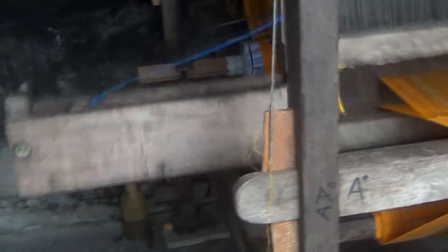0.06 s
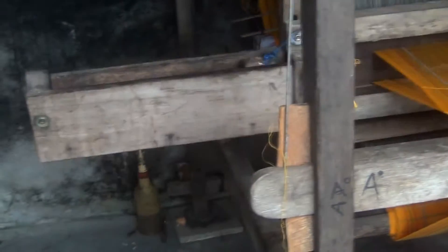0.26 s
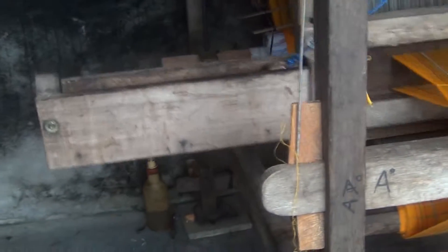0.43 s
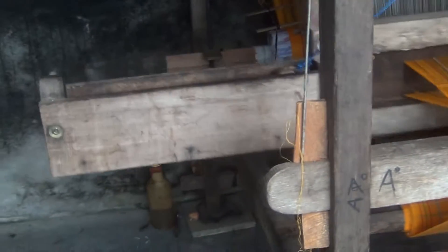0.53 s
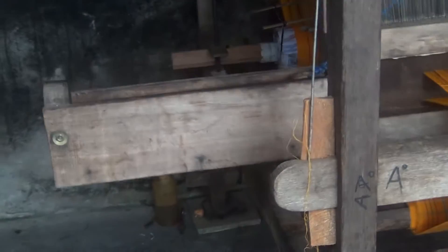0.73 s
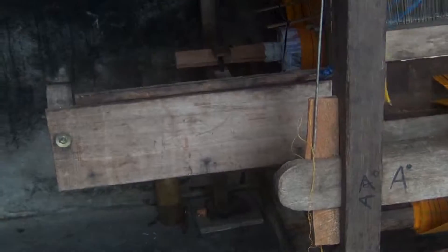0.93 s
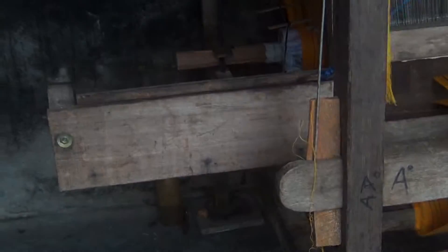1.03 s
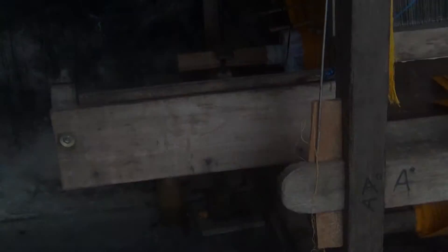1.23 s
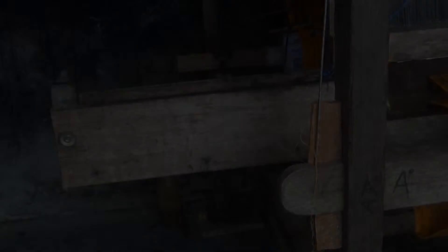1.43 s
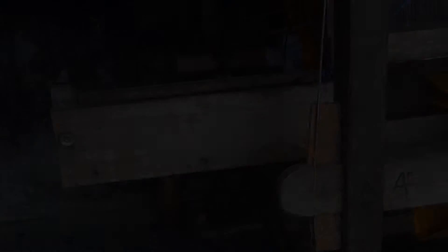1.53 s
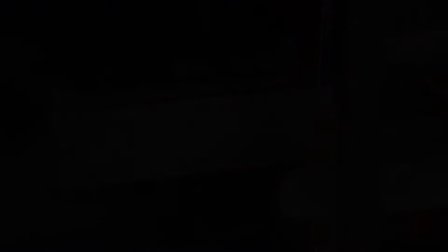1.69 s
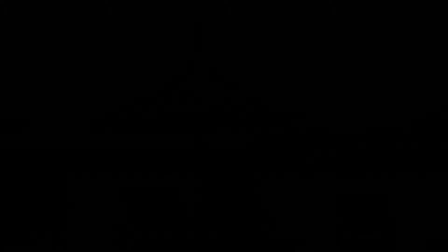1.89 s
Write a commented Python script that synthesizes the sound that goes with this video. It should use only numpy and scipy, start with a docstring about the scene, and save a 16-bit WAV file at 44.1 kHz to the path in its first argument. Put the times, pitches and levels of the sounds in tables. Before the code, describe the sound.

A wooden handloom clacks sharply as its shuttle rattles across and lands with a brief metallic ring. The beater clacks, then soft knocks and a creak follow. Quiet hiss fades away in the small workshop, heard mostly on the right.

```python
"""A small hard-walled workshop, where a wooden handloom weaves one pick over a steady hiss that fades away.
The picker knocks the shuttle across; it rumbles along its race and lands with a ring of metal.
The beater clacks, then the shafts shift with soft knocks, a creak and a rough drone of the frame.
Impacts give a broadband crack and excite damped modes; friction gives noise or sustains the modes.
The cracks reverberate in a diffuse field whose treble decays first."""
import sys
import numpy as np
from scipy import signal
from scipy.fft import rfft, irfft
from scipy.io import wavfile
from scipy.ndimage import uniform_filter1d

SR = 44100
rng = np.random.default_rng(int(sys.argv[2]) if len(sys.argv) > 2 else 0)


def inscribe(sig):
    """Save sig as 16-bit PCM at rate SR to the path in sys.argv[1].

    A 1-D sig is mono; a 2-D sig holds one channel per row.
    Samples are clipped to [-1, 1] before scaling.
    """
    pcm = np.round(np.clip(np.atleast_2d(sig).T, -1, 1) * 32767)
    wavfile.write(sys.argv[1], SR, pcm.astype(np.int16))


N = 85995
LEAD = SR // 10  # samples before t = 0, so that the loom is already sounding
TIME = np.arange(-LEAD, N) / SR


def from_db(db):
    """Amplitude ratio of a level in decibels."""
    return 10 ** (np.asarray(db) / 20)


def at_hz(points, hz):
    """Interpolation of a table on a logarithmic frequency axis."""
    f, value = np.transpose(points)
    return np.interp(np.log(np.maximum(hz, 1)), np.log(f), value)


def panned(db):
    """Interchannel level difference, left minus right, as two gains with a mean of one."""
    gains = from_db(np.array([np.atleast_1d(db), -np.atleast_1d(db)]) / 2)
    return gains / gains.mean(axis=0)


def convolve(x, response):
    """A linear system convolves its input with its impulse response."""
    return signal.fftconvolve(np.atleast_2d(x), np.atleast_2d(response))[:, :len(TIME)]


def impulse(start):
    """An ideal impact: a unit impulse."""
    return 1.0 * (np.arange(len(TIME)) == int(start * SR) + LEAD)


def minimum_phase(spectrum, size=4096):
    """Causal response of unit energy, obtained by folding the cepstrum of a spectrum."""
    magnitude = from_db(at_hz(spectrum, np.fft.rfftfreq(size, 1 / SR)))
    cepstrum = irfft(np.log(magnitude))
    folded = 2 * cepstrum[:size // 2] * (np.arange(size // 2) > 0)
    response = irfft(np.exp(rfft(folded, size)))
    return response / np.linalg.norm(response)


def even_noise(count, size=512):
    """Whitening: noise of unit variance, its energy spread evenly over time and frequency."""
    noise = rng.standard_normal(count)
    for _ in range(2):
        cells = signal.stft(noise, nperseg=size)[2]
        noise = signal.istft(cells / (abs(cells) + 1e-12), nperseg=size)[1][:count]
    return noise / noise.std()


def swell(start, attack, held, t60):
    """Linear rise, then exponential decay from `held` after the start; all times in seconds."""
    age = np.maximum(TIME - start, 0)
    return np.minimum(age / attack, 1) * from_db(-60 * np.maximum(age - held, 0) / t60)


def wavering(hz, width_hz, rough):
    """Random modulation broadens a line: amplitude and phase wander, as a ring's do in a room."""
    pole = np.exp(-2 * np.pi * width_hz / SR)
    slow = signal.lfilter([1], [1, -2 * pole, pole * pole], rng.standard_normal((2, len(TIME))))
    wander = 1 + rough * (slow[0] + 1j * slow[1]) / slow.std()
    wander /= np.sqrt(uniform_filter1d(abs(wander) ** 2, size=SR // 16))  # steady mean power
    return np.real(wander * np.exp(2j * np.pi * (hz * TIME + rng.random())))


# Left-right coherence of the field: f/Hz, coherence/1
COHERENCE = [(30, 0.42), (100, 0.86), (500, 1), (1000, 0.87), (2000, 0.7), (4000, 0.33), (8000, 0.6),
             (14000, 0.08)]
# Balance, left minus right: f/Hz, level/dB
BALANCE = [(30, -3), (70, -7), (150, -4.5), (300, -7.5), (1000, -10.5), (2000, -11.5), (4000, -14.5),
           (6500, 0), (9000, -1), (13000, -13)]
def diffuse(left_noise, right_noise):
    """Stereo spectrum of a diffuse field: partially coherent, and stronger on the right."""
    hz = np.fft.rfftfreq(len(right_noise), 1 / SR)
    coherence = np.clip(at_hz(COHERENCE, hz), 0, .999)
    right = rfft(right_noise)
    left = coherence * right + np.sqrt(1 - coherence ** 2) * rfft(left_noise)
    return hz, np.array([left, right]) * panned(at_hz(BALANCE, hz))


# Reverberation time: f/Hz, T60/s
REVERBERATION = [(100, 0.43), (400, 0.46), (1000, 0.5), (2800, 0.28), (7000, 0.27), (15000, 0.1)]
def room_response(attack, bands=12):
    """Reverberation: dense reflections build up, then decay exponentially in each band."""
    t = np.arange(SR) / SR
    hz, field = diffuse(right_noise=even_noise(SR), left_noise=even_noise(SR))
    centres = np.geomspace(80, 16000, bands)
    tail = 0
    for centre, weights in zip(centres, np.eye(bands)):
        band = irfft(field * at_hz(np.transpose([centres, weights]), hz), SR)
        tail += band * from_db(-60 * t / at_hz(REVERBERATION, centre))
    tail *= 1 - np.exp(-t / attack)
    return tail / np.linalg.norm(tail.mean(axis=0))


def resonances(modes, rough=0.8):
    """Modal superposition: a sum of wavering partials, each panned by its frequency."""
    return sum(from_db(db) * wavering(hz, width, rough) * panned(at_hz(BALANCE, hz))
               for hz, width, db in modes)


# Spectrum of wood striking wood: f/Hz, relative level/dB
WOOD_CRACK = [(40, -20), (100, -22), (200, -7.5), (450, -4.5), (800, -3), (1300, -3), (2000, -2.5),
              (2800, -4), (3800, -8), (6000, -10), (11000, -21), (16000, -42)]
def knocks(blows, modes, crack_db, ring_db, t60, attack):
    """Impact excitation: each blow cracks through the room and adds energy to the part's damped modes."""
    bass_hz, treble_hz = 330, 3450
    cracks, energy = 0, 0
    for start, db, bass_db, treble_db in blows:
        shelves = [(bass_hz / 2, bass_db), (bass_hz * 2, 0),
                   (treble_hz / 2, 0), (treble_hz * 2, treble_db)]
        contact = minimum_phase(shelves)
        contact /= abs(rfft(contact, SR)[1000])  # unit gain at 1 kHz
        cracks += from_db(db) * convolve(convolve(impulse(start), contact), room_response(attack))
        energy += (from_db(db) * swell(start, attack, attack, t60)) ** 2
    ring = np.sqrt(energy) * resonances([(hz, 21, db) for hz, db in modes], rough=0.92)  # width 21 Hz
    return from_db(crack_db) * convolve(cracks, minimum_phase(WOOD_CRACK)) + from_db(ring_db) * ring


# Ambient spectrum: f/Hz, relative level/dB
HISS_SPECTRUM = [(30, -17), (60, -22), (93, -7.5), (250, -8.5), (420, -9.5), (700, -3), (950, -3.5),
                 (1300, 0.5), (1810, -7), (3000, -7), (4500, -11.5), (5200, -9.5), (8000, -10),
                 (11000, -19.5), (16000, -29)]
# Its narrow peaks: f/Hz, half-width/Hz, rise/dB
HISS_RESONANCES = [(760, 25, 5), (895, 18, 6), (1160, 35, 4.5), (2146, 18, 9), (2562, 44, 6.5),
                   (2970, 90, 6), (5320, 60, 7)]
# Its envelope: t/s, level/dB
HISS_ENVELOPE = [(0, -41.5), (0.2, -41), (0.6, -45), (1.15, -48.5), (1.5, -51), (1.75, -54), (1.89, -60.5)]
def background():
    """Ambient noise: a diffuse hiss with Lorentzian peaks, sinking in level."""
    right, left = rng.standard_normal((2, len(TIME)))
    hz, field = diffuse(left, right)
    peaks_db = sum(db / (1 + ((hz - centre) / width) ** 2) for centre, width, db in HISS_RESONANCES)
    hiss = irfft(field * from_db(at_hz(HISS_SPECTRUM, hz) + peaks_db), len(TIME))
    envelope = from_db(np.interp(TIME, *np.transpose(HISS_ENVELOPE)))
    return envelope * hiss / hiss.mean(axis=0).std()


# Shuttle impacts: t/s, level/dB, bass/dB, treble/dB
SHUTTLE_BLOWS = [(-0.03, -18, 11.5, -18), (0.262, -1, 1, -15.5), (0.283, -8, 9, -13),
                 (0.3345, -5.5, -17, 5), (0.357, -11.5, -5.5, -2), (0.415, -24, 6, 13),
                 (0.445, -24, 14.5, -7)]
# Shuttle modes: f/Hz, level/dB
SHUTTLE_PARTIALS = [(680, -3), (772, -1), (845, -3), (969, 0.5), (1381, -3), (1630, -4), (1971, -4),
                    (2065, -6), (2386, -8), (2920, -12), (4010, -13)]
def shuttle():
    """Impacts with a slow build-up merge into a rumble as the shuttle runs, lands and settles."""
    return knocks(SHUTTLE_BLOWS, SHUTTLE_PARTIALS, crack_db=8.5, ring_db=-27.5, t60=0.39, attack=0.0162)


# Low frame modes: t/s, f/Hz, level/dB, rise/s, T60/s
FRAME_MODES = [(-0.01, 89.4, -51.5, 0.017, 2.3), (0.264, 150.4, -29.5, 0.015, 0.22),
               (0.275, 78.6, -36.5, 0.047, 0.14), (0.28, 103.3, -42, 0.024, 0.49),
               (0.27, 299, -32.5, 0.042, 0.39), (0.43, 182.4, -41, 0.045, 0.12),
               (0.68, 184.6, -43.5, 0.017, 0.75), (0.95, 81.3, -48, 0.048, 0.48)]
def frame_thuds():
    """Damped free vibration: the heavy frame's modes swell under a push and die away."""
    hum = 0
    for start, hz, db, rise, t60 in FRAME_MODES:
        hum += from_db(db) * swell(start, rise, rise, t60) * np.sin(2 * np.pi * (hz * TIME + rng.random()))
    return hum * panned(-5.5)


# Picker impacts: t/s, level/dB, bass/dB, treble/dB
PICKER_BLOWS = [(0.2157, -3, -11, -9), (0.2205, -3, -5, -11), (0.241, -4, 2, -14)]
# Picker modes: f/Hz, level/dB
PICKER_PARTIALS = [(940, -1), (1381, -3), (1934, 0.5), (2165, -1.5), (2390, -5), (3700, -9)]
def picker():
    """Impulsive excitation: the picker rings from the sharp blows that throw the shuttle."""
    return knocks(PICKER_BLOWS, PICKER_PARTIALS, crack_db=8.5, ring_db=-24, t60=0.24, attack=0.0006)


# Light contacts: t/s, level/dB
TICK_CONTACTS = [(0.2175, -2), (0.2615, -4.5), (0.3349, 4.5), (0.447, -18), (0.545, -25), (0.68, -1)]
# Their spectrum: f/Hz, relative level/dB
TICK_SPECTRUM = [(1500, -22), (3500, 3.5), (7000, -1.5), (11000, -3.5), (16000, -9)]
def ticks():
    """Brief, hard contacts are rich in treble: each scatters a bright snap through the room."""
    snap = minimum_phase(TICK_SPECTRUM)
    return sum(from_db(db) * convolve(convolve(impulse(start), snap), room_response(attack=0.00025))
               for start, db in TICK_CONTACTS)


# Wood sliding on wood: t/s, duration/s, level/dB, treble slope/(dB per decade), room gain/dB
SLIDE_STROKES = [(0.226, 0.117, -27.5, 17, -7), (0.933, 0.063, -29.5, -22, -12)]
# Friction spectrum: f/Hz, relative level/dB
SLIDE_SPECTRUM = [(200, -27), (800, -9.5), (1500, -4), (2600, -1.5), (4500, 2), (7000, -3.5), (11000, -6.5),
                  (16000, -21)]
def slides(slips_per_s=2500, edge_s=0.02, treble_hz=3450):
    """Stick-slip friction: a dense run of tiny random slips, heard directly and through the room."""
    chance = slips_per_s / SR
    out = 0
    for start, length, db, slope, room_db in SLIDE_STROKES:
        slips = (rng.random(len(TIME)) < chance) * rng.standard_normal(len(TIME)) / np.sqrt(chance)
        stroke = np.clip(np.minimum(TIME - start, start + length - TIME) / edge_s, 0, 1)
        tilted = [(hz, level + slope * np.log10(max(hz / treble_hz, 1))) for hz, level in SLIDE_SPECTRUM]
        rub = from_db(db) * convolve(slips * stroke, minimum_phase(tilted))
        direct = from_db(-7.5) * rub * panned(-11)
        out += direct + from_db(room_db) * convolve(rub, room_response(attack=0.00094))
    return out


# Modes of the shuttle's metal tip: f/Hz, level/dB, t/s, held/s, T60/s
TIP_MODES = [(6274, -1.5, 0.343, .064, .26), (7781, -6, 0.347, .025, .25), (9469, -5.5, 0.343, .04, .32),
             (11262, -4, 0.345, .055, .26), (13199, -3, 0.337, .04, .23), (15300, -8, 0.339, .03, .21)]
def metal_tip():
    """Friction drives high modes as the tip grinds to a stop, a little differently on each side."""
    ring = 0
    for hz, db, start, held, t60 in TIP_MODES:
        mid, side = [wavering(hz, width_hz=42, rough=0.55) for _ in range(2)]
        stereo = mid + from_db(-4) * side * [[1], [-1]]
        ring += from_db(db) * swell(start, 0.012, held, t60) * stereo
    return from_db(-28.5) * ring * panned(-9)


# Beater impacts: t/s, level/dB, bass/dB, treble/dB
BEATER_BLOWS = [(0.6693, -10, -12, -10), (0.672, -4, -7, 0), (0.681, -4.5, -4, -1), (0.704, -6.5, -3, -7),
                (0.797, -18, -4, -8)]
# Beater modes: f/Hz, level/dB
BEATER_PARTIALS = [(586, -9), (725, -6), (802, -4), (990, -3), (1065, -1), (1382, -6), (1555, -6),
                   (1690, -1), (2070, 1.5), (2605, -4.5), (3110, -5.5), (3530, -7), (3760, -7)]
def beater():
    """Repeated impact: the beater hits the cloth and chatters; its first touch rings briefly."""
    chatter = knocks(BEATER_BLOWS, BEATER_PARTIALS, crack_db=8, ring_db=-25, t60=0.27, attack=0.001)
    touch = resonances([(1460, 60, -29), (2000, 50, -18.5)])  # f/Hz, width/Hz, level/dB
    return chatter + swell(start=0.669, attack=0.002, held=0.006, t60=0.04) * touch


# Rubbed frame modes: f/Hz, width/Hz, level/dB
DRONE_MODES = [(180, 40, -53), (282, 16, -42.5), (350, 30, -51)]
def frame_drone():
    """Forced vibration: rubbing sustains low modes of the frame as the shafts shift."""
    return swell(start=0.8, attack=0.038, held=0.13, t60=0.6) * resonances(DRONE_MODES)


# Shaft impacts: t/s, level/dB, bass/dB, treble/dB
SHAFT_BLOWS = [(0.850, -12.5, -6, -7), (0.934, -15.5, -6, -7)]
# Shaft modes: f/Hz, level/dB
SHAFT_PARTIALS = [(815, 1), (1054, 1), (1200, 0.74), (1400, 0.61), (1698, -0.16)]
def shafts():
    """Soft impacts of the shifting shafts excite quickly damped modes."""
    return knocks(SHAFT_BLOWS, SHAFT_PARTIALS, crack_db=6, ring_db=-25.5, t60=0.19, attack=0.008)


# Lower and upper modes of a rubbed shaft: f/Hz, width/Hz, level/dB
GROAN_MODES = [(690, 60, -41), (755, 55, -38.5), (815, 50, -37), (875, 60, -42)]
CREAK_MODES = [(1060, 15, -34), (2509, 50, -35), (2950, 70, -39), (4300, 60, -39.5), (5450, 60, -41)]
def shaft_creak():
    """Frictional excitation: a shaft groans in its lower modes, then creaks in its upper ones."""
    groan = swell(start=0.921, attack=0.0027, held=0.034, t60=0.081) * resonances(GROAN_MODES)
    creak = swell(start=0.936, attack=0.02, held=0.023, t60=0.13) * resonances(CREAK_MODES)
    return groan + creak


def far_tone(start=1.82, attack=0.011):
    """A complex tone of three steady partials, faint and far off."""
    partials = [(749, -60), (1496, -68), (1613, -67)]  # f/Hz, level/dB
    tone = sum(from_db(db) * np.sin(2 * np.pi * hz * TIME) for hz, db in partials)
    return tone * np.clip((TIME - start) / attack, 0, 1) * panned(-13)


def scene(fade_end_s=1.975, fade_s=0.095):
    """Linear superposition of the loom and its surroundings, fading at the end."""
    loom = picker() + shuttle() + metal_tip() + beater() + shafts()
    loom += frame_drone() + shaft_creak() + ticks() + slides() + frame_thuds()
    fade = np.clip((fade_end_s - TIME) / fade_s, 0, 1)
    return (fade * (loom + background() + far_tone()))[:, LEAD:]


def record(dry, cutoff_hz=15900):
    """Band limiting: an elliptic low-pass filter cuts the top steeply."""
    return signal.sosfilt(signal.ellip(12, .1, 80, cutoff_hz, fs=SR, output="sos"), dry)


dry = scene()
out = record(dry)
inscribe(out)
```